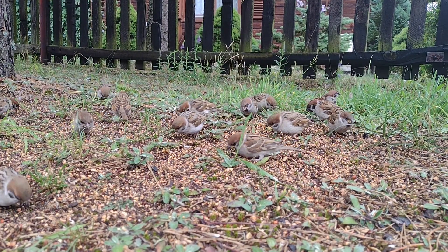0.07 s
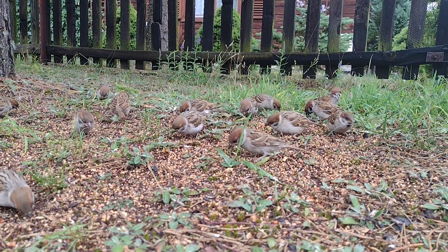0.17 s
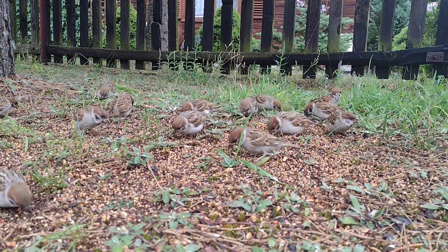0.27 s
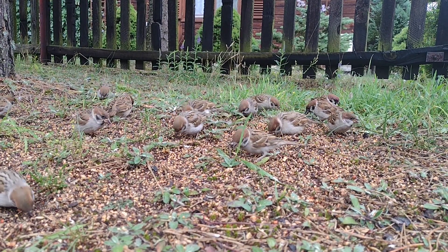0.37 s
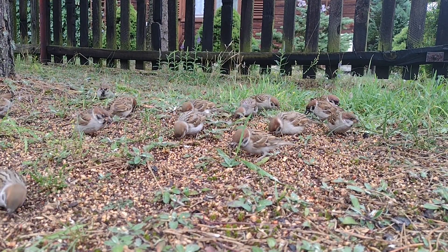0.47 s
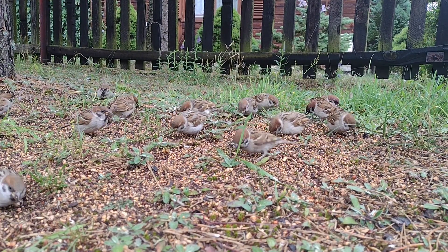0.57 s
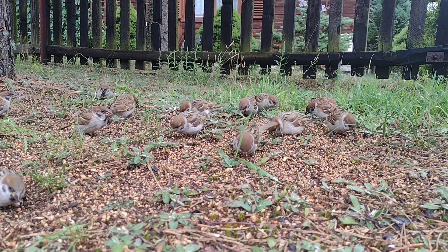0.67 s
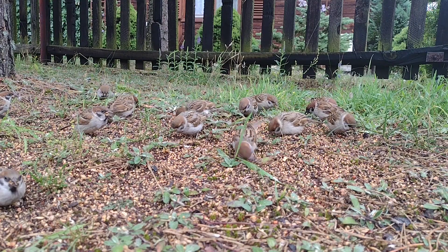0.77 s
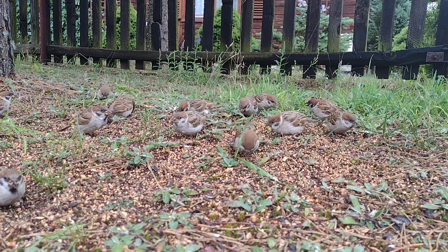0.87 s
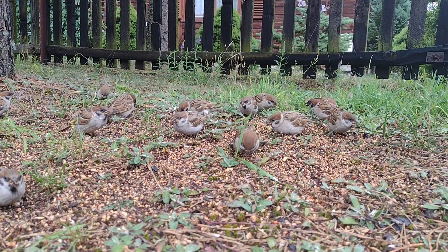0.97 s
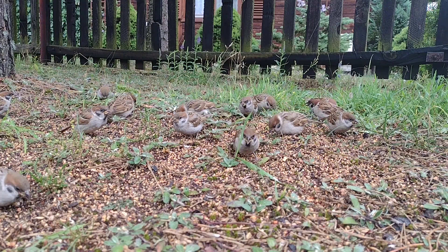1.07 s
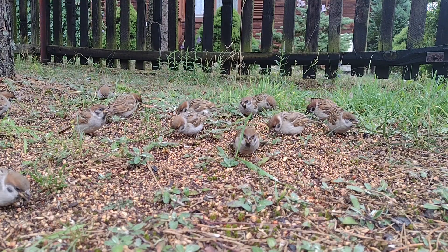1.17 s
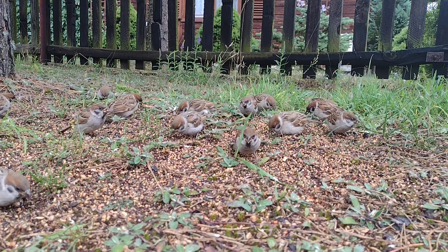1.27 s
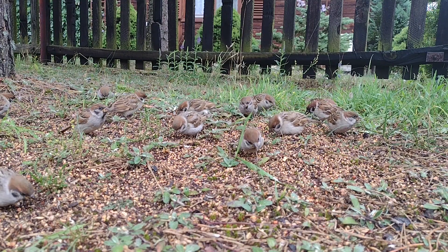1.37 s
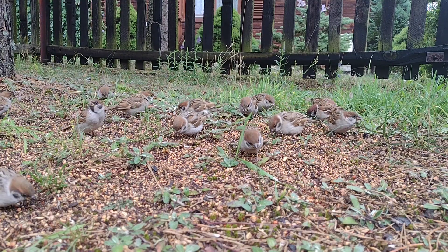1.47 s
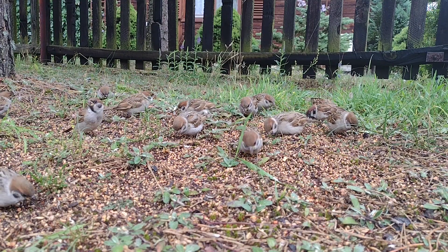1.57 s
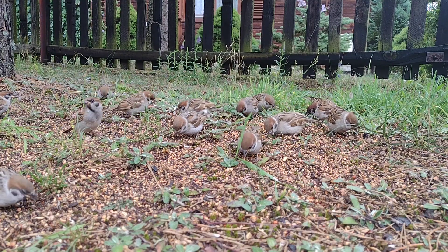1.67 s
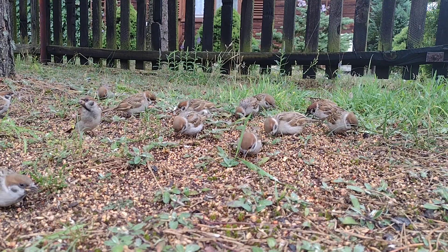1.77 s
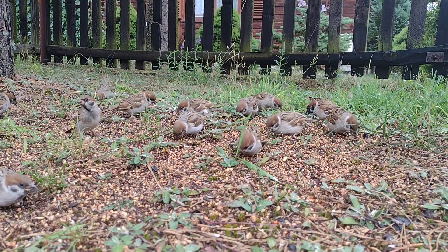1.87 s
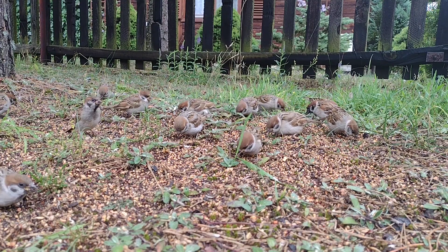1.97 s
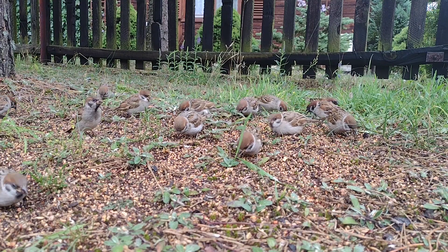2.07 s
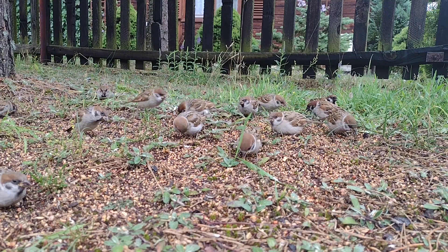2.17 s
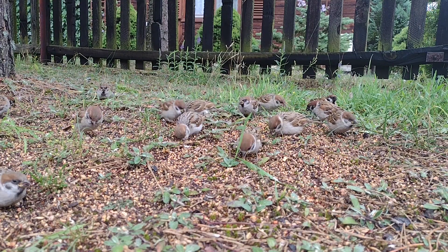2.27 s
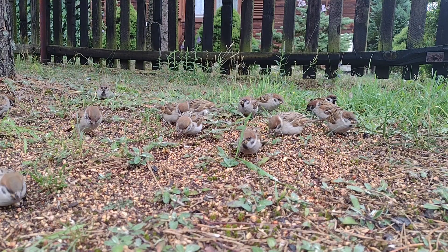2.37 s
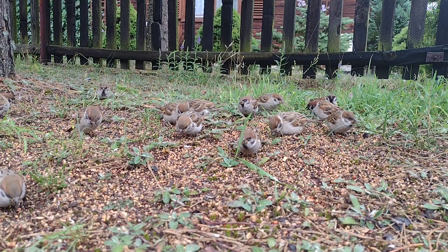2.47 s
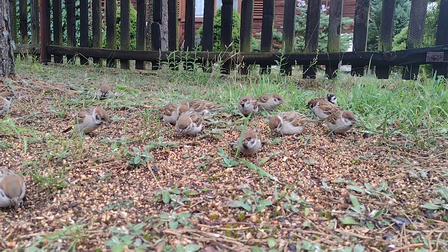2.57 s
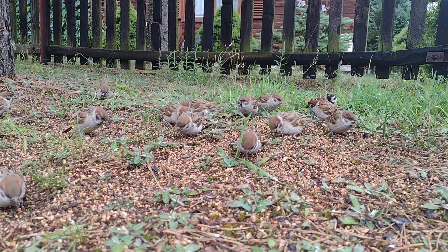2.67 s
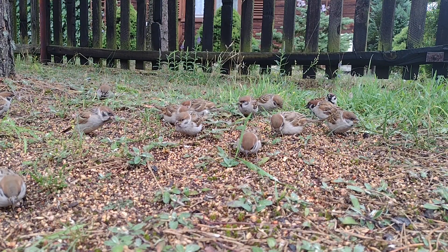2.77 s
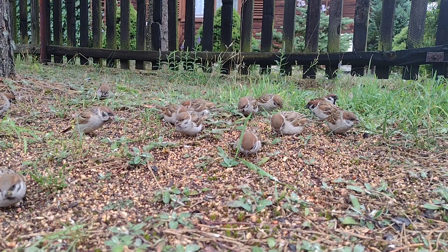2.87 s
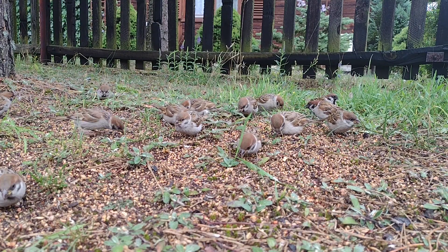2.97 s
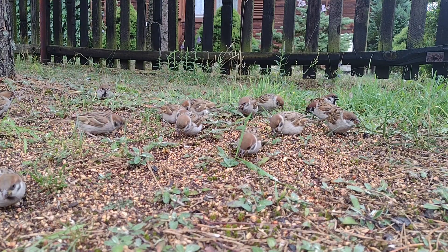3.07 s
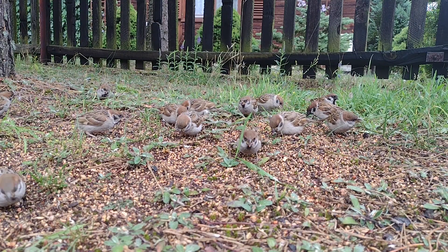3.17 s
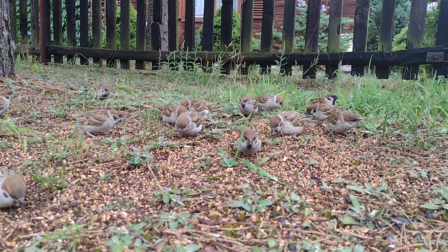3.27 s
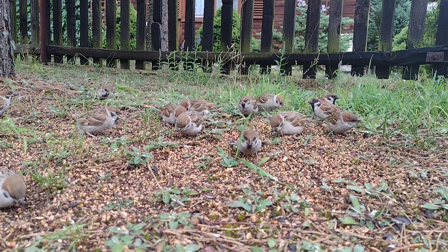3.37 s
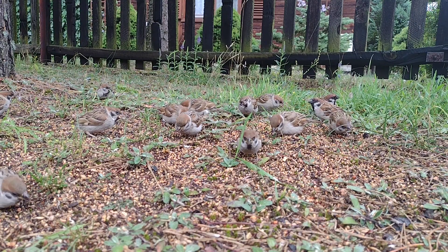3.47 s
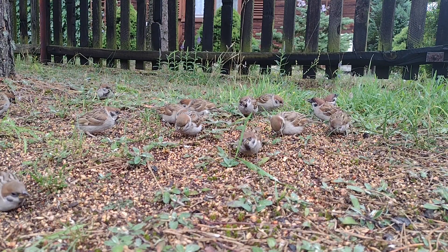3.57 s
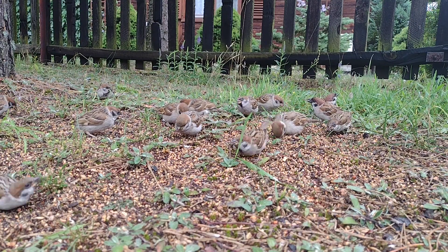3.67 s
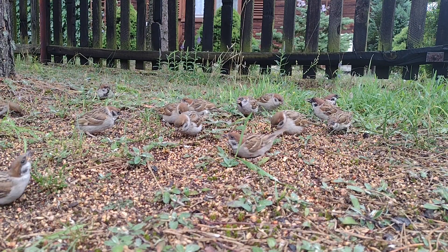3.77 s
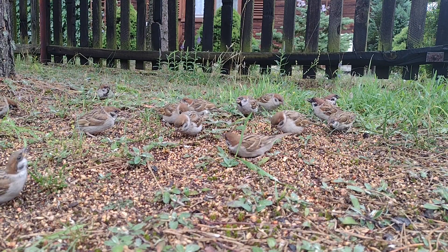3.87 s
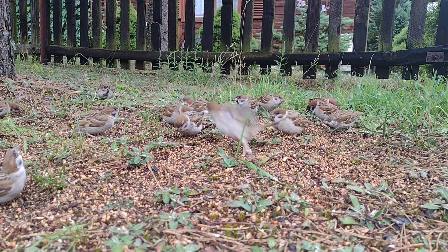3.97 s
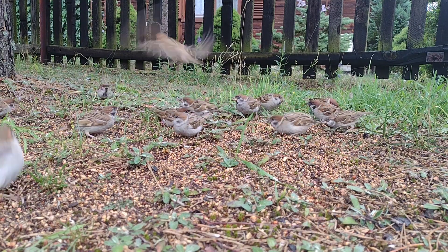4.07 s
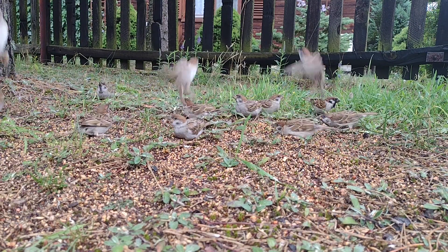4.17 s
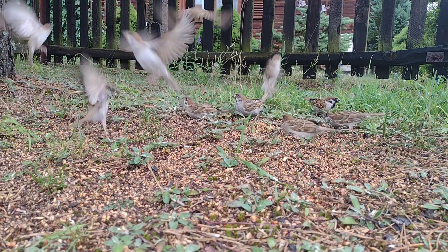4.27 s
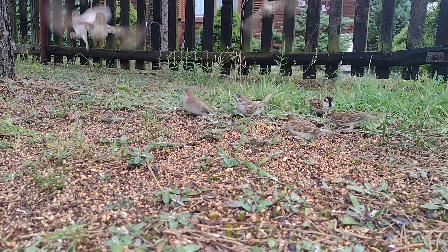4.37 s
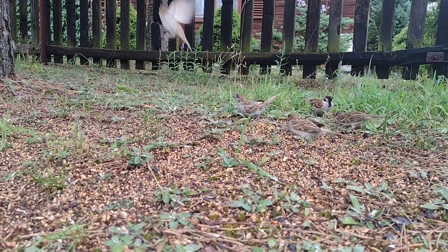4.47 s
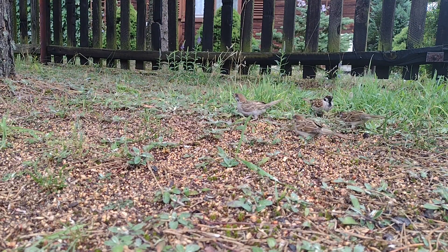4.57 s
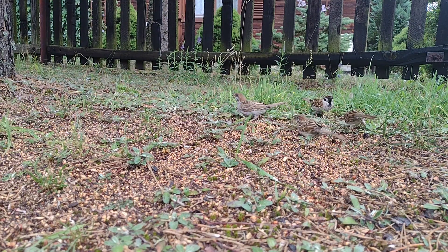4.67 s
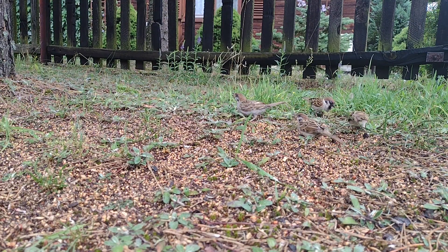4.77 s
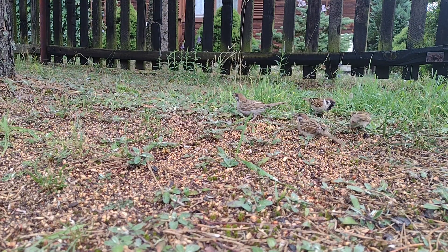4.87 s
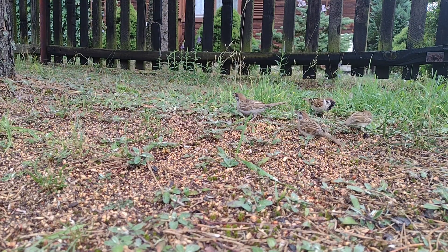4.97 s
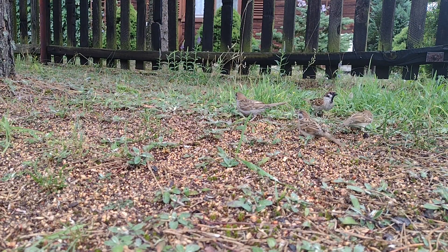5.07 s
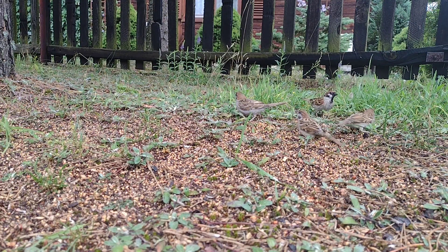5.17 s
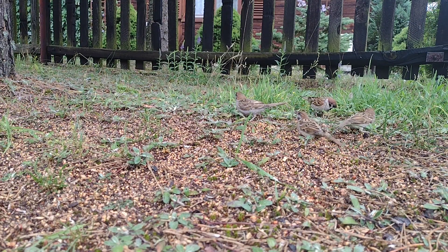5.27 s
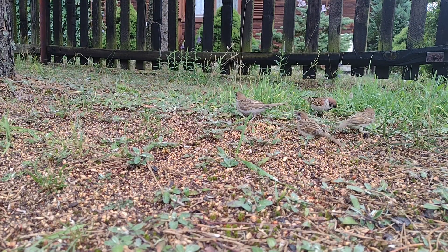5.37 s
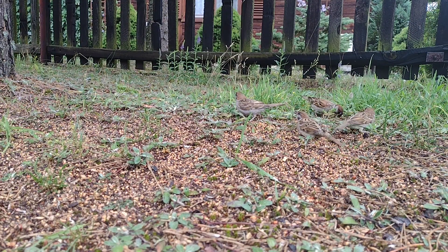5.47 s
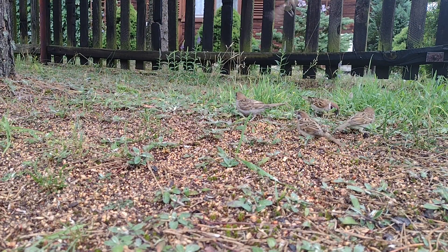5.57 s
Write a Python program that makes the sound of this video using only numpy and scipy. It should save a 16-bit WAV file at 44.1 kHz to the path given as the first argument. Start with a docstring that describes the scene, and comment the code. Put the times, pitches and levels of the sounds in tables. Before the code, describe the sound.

A low microphone sits close to sparrows feeding on seed outdoors. From 0 to 4 seconds it is quiet: soft hiss, a faint distant hum and light wind rumble that swells near 0.5 seconds, with low bumps towards the left. Tiny dry pecks and brittle husk cracks sprinkle across the stereo field, with brief foot scuffs in litter at the start, 0.55, 0.9, 1.4 and 3.1. Thin, near-pure, very high peeps fall slightly in pitch, about four or five a second; one lower, raspy-then-clear chirp leaps up at 0.4. At 4.1 the birds startle, and by 4.35 the flock is a loud fluttering whoosh and feathery swish, beating about 27 times a second. Close birds thump past around 4.3 and 4.5, with sharp seed ticks. Low air buffets hit the microphone at 4.8 to 5.1. Wings fade away, leaving peeps, pecks and scuffs near 5.4 until the end.

```python
"""Sparrows feed on seed on a lawn: beaks crack husks (snaps of noise with a brief ring), feet rake litter in grains.
Contact calls are near-sine tones that fall in pitch; lower chirps leap up from a raspy hook into a clear note.
Most of the flock then takes off: flapping gates noise into whoosh and swish, kicked seed ticks, close birds
pass with pressure pulses, and the draught buffets a low microphone.
Light wind rumbles as filtered noise under a distant outdoor hum and a soft hiss."""
import sys
import numpy as np
from scipy import signal
from scipy.fft import rfft, irfft, next_fast_len
from scipy.io import wavfile
from scipy.ndimage import uniform_filter1d

SR = 44100
rng = np.random.default_rng(int(sys.argv[2]) if len(sys.argv) > 2 else 0)


def unload_audio(sound):
    """Save the sound as a 16-bit wav file, at the path given as the first command line argument."""
    columns = np.transpose(np.atleast_2d(sound))
    # keep every value between -1 and 1, then stretch to whole-number steps
    steps = np.round(np.clip(columns, -1, 1) * 32767)
    wavfile.write(sys.argv[1], SR, steps.astype(np.int16))


N = 247842
TIME = np.arange(N) / SR

# thin falling calls: [t/s, fall in pitch f/Hz, level/dB, left minus right level/dB]
CONTACT_CALLS = [(.15, 600, -52.5, -7), (.37, 606, -52, 6), (.556, 970, -51, -9), (.764, 550, -51, 0),
                 (.982, 500, -46, 2), (1.13, 400, -50, 3), (1.365, 650, -52.5, 3), (1.53, 596, -55, -12),
                 (1.7, 550, -54, -4), (1.911, 700, -51, 1), (2.132, 300, -48, 4), (2.298, 1090, -48, 3),
                 (2.538, 1100, -46, 4), (2.815, 500, -45, -1), (2.865, 647, -47.5, 1),
                 (3.011, 420, -50.5, 4), (3.185, 500, -51.5, -3), (3.385, 650, -48, 8),
                 (3.605, 910, -45, -6), (3.975, 590, -48, -5), (4.637, 545, -44, -4),
                 (4.865, 300, -50.5, 6), (5.113, 353, -47, 7), (5.345, 680, -51, -10),
                 (5.555, 300, -52, -15)]
# lower chirps: [t/s of the upward hook, final pitch f/Hz, level/dB]
HOOKED_CHIRPS = [(0.368, 4076, -38.5), (1.995, 3280, -62)]
# cracking husks and kicked seed: [t/s, relative peak level/dB, ring f/Hz, left minus right level/dB]
HUSK_CRACKS = [(0.2872, -16.5, 10700, -0.5), (0.4134, -23.5, 8640, 2), (0.5715, -27, 9300, -0.5),
               (0.9028, -24, 10200, -2.5), (1.2974, -24, 11000, -4.5), (1.3107, -31, 10100, 3),
               (1.4144, -16, 11800, -4), (1.6282, -31, 11100, 0.5), (2.393, -25.5, 10200, 0.5),
               (2.6449, -22.5, 11900, -0.5), (2.752, -18, 8700, 11.5), (2.819, -27, 9250, -0.5),
               (2.8786, -24.5, 12900, 1.5), (3.032, -28.5, 8840, 8), (3.496, -21, 10500, -4),
               (4.0201, -20, 10200, -2.0), (4.1794, -16.5, 10900, -1), (4.2622, -7, 10000, 5),
               (4.3325, -3.5, 9600, 2.5), (4.432, -6, 10400, 7.5), (4.796, -15, 10400, 3.5),
               (4.9038, -19, 11800, -2.5), (5.4163, -15, 8990, 0.5)]
# spectrum of a husk's snap: [multiple of its ring frequency, level/dB]
SNAP_SPECTRUM = [(.05, -42), (.15, -28), (.4, -15.5), (.68, -14), (1, 2), (1.25, -8), (1.6, -18)]
# feet scratching and hopping in the litter; the 2 ms row is the lower part of a husk's crack:
# [t/s, length t/s, level/dB, centre f/Hz]
LITTER_SCUFFS = [(.003, .044, -43, 10000), (0.552, 0.079, -47, 10400), (0.894, 0.027, -41.5, 9900),
                 (1.296, 0.0024, -38, 4600), (1.391, 0.017, -40, 10800), (3.089, 0.025, -41.5, 10500),
                 (4.429, 0.0056, -28, 3460), (5.152, .02, -41.5, 1700), (5.378, .009, -39, 1610),
                 (5.379, 0.01, -33.5, 9800), (5.413, .02, -44, 1460)]
# birds that fly close past: [first stroke t/s, end t/s, stroke rate f/Hz, nearest t/s, level/dB]
CLOSE_PASSES = [(4.157, 4.355, 27.8, 4.3, -17.5), (4.399, 4.745, 24.6, 4.5, -16)]
# spectrum of a close stroke: [f/Hz, level/dB]
STROKE_SPECTRUM = [(120, 4.5), (300, -2), (600, -0.5), (900, -12), (1500, -28), (3500, -23.5)]
# spectra of the flock in flight: [f/Hz, level/dB per Hz]
DRAUGHT_SPECTRUM = [(20, 2.5), (42, 1), (62, 0.5), (80, 4.5), (104, -3), (135, -4), (220, -12), (330, -26)]
WHOOSH_SPECTRUM = [(100, 2.5), (230, 6), (340, 4), (480, 1.5), (660, -4.5), (1000, -13), (1400, -11.5),
                   (2000, -29)]
FEATHER_SPECTRUM = [(900, -3.5), (1900, -5), (3000, -6.5), (5200, -8), (7800, -4), (10000, 2.5),
                    (12500, -3.5), (15800, -10.5)]
# eddies that hit the microphone: [t/s, peak level/dB before panning, f/Hz]
MICROPHONE_EDDIES = [(.161, -27, 33.7), (0.571, -28.5, 58), (.73, -26.5, 29.6), (1.015, -30.5, 44.7),
                     (2.208, -31, 42.7), (2.378, -31, 29.3), (4.814, -17.5, 94), (4.912, -17.5, 40.8),
                     (5.051, -19, 45)]
# spectra of wind, hum and hiss: [f/Hz, level/dB per Hz]
RUMBLE_SPECTRUM = [(6, 6), (20, 8.5), (35, 2.5), (58, -6.5), (88, -4), (108, -15), (150, -26)]
HUM_SPECTRUM = [(60, 3.5), (130, -2), (240, -4.5), (330, -5.5), (450, -9.5), (620, -11), (1000, -20),
                (1500, -21), (3000, -23)]
HISS_SPECTRUM = [(700, 3), (1500, -3.5), (2800, -3), (4000, -0.5), (5200, -2.5), (7500, 1.5), (10000, 4),
                 (12500, -4.5), (15800, -7.5)]
# course of the hiss: [t/s, level/dB before HISS_OFFSET_DB]
HISS_COURSE = [(0.0, -51.5), (1.95, -55.5), (2.64, -54), (3.17, -49.5), (4.05, -47)]

HUM_DB, HISS_OFFSET_DB = -46.5, 3.5
BREEZE_DB, GUST_DB, GUST_S = -39, -29.5, 0.55  # steady wind, and one gust with its time
EDDY_PAN_DB = 16  # left minus right
PECK_HZ = 10550
CRACK_LAG_S = .0011  # a crack begins this long after its listed time
PEEP_HZ, PEEP_HZ_PER_DB, PEEP_USUAL_DB = 7313, 14, -50  # pitch in mid call; a louder call is a little higher
PEEP_S, PEEP_S_PER_HZ = .05, .000022  # a deeper fall takes longer
# pitch leaps from a share of itself, overshoots by a share and sags back
HOOK_S, HOOK_FROM, OVERSHOOT, SAG_S = 0.0026, .48, .25, .034
STARTLE_S, TAKEOFF_S = 4.1, 4.35  # the first birds start; the whole flock is in the air
WAKE_S = 4.785  # the stirred air reaches the microphone
RECEDE_DB_PER_S = 4  # the wings fade as the flock draws away
PASS_S = 0.078  # time in which a bird covers its nearest distance
TOP_HZ = 16000


def undb(db):
    """Amplitude ratio: twenty decibels are a factor of ten."""
    return 10 ** (np.asarray(db) / 20)


def unit(x):
    """Normalisation to a root-mean-square of 1."""
    return x / np.sqrt(np.mean(x ** 2) + 1e-18)


def pan(db):
    """Interaural level difference: left and right gains share it equally."""
    return undb(np.array([[db], [-db]]) / 2)


def add(out, s, x):
    """Superposition: a short sound is summed in at time s."""
    i = max(int(s * SR), 0)
    out[:, i:i + x.shape[-1]] += x[..., :max(N - i, 0)]


def curve(rows):
    """Linear interpolation in time of the table's second column."""
    t, value = np.transpose(rows)
    return np.interp(TIME, t, value)


def colour(x, points):
    """Spectral shaping by (f/Hz, level/dB) points with rolled-off ends, keeping the power of white noise."""
    hz, db = np.transpose(points)
    size = next_fast_len(x.shape[-1] + 512)
    freqs = np.fft.rfftfreq(size, 1 / SR)
    gain = undb(np.interp(np.log(freqs + 1), np.log(hz), db))
    low_end = freqs / (freqs + hz[0] / 2)
    high_end = 1 + (freqs / (2 * hz[-1])) ** 4
    response = unit(gain * low_end / high_end)
    return irfft(rfft(x, size) * response, size)[..., :x.shape[-1]]


def noise(likeness, size=N):
    """Partial correlation: two channels of white noise share a part of their power."""
    common, *own = rng.standard_normal((3, size))
    share = np.clip(likeness, 0, 1)
    return np.sqrt(share) * common + np.sqrt(1 - share) * np.array(own)


def diffuse(likeness, null_hz=1350):
    """Diffuse field at two spaced ports: coherence is highest in the bass and follows a sinc in frequency."""
    size = next_fast_len(N)
    alike = np.clip(likeness, 0, .99) * np.sinc(np.fft.rfftfreq(size, 1 / SR) / null_hz)
    weights = np.sqrt(np.array([1 + alike, 1 - alike]) / 2)
    spectra = rfft(rng.standard_normal((2, size))) * weights
    mid, side = irfft(spectra, size)[:, :N]
    return np.array([mid + side, mid - side])


def walk(rate):
    """Random modulation: held random steps, twice averaged into a smooth wander with spread near 1."""
    k = max(int(SR / rate), 1)
    steps = np.repeat(rng.standard_normal(N // k + 1), k)
    return 1.3 * uniform_filter1d(uniform_filter1d(steps, k), k)[:N]


def envelope(at, attack_s, hold_s, release_s):
    """Exponential growth to 1 at a given time, a hold, then exponential decay."""
    growth = np.minimum(TIME - at, 0) / attack_s
    decay = np.maximum(TIME - at - hold_s, 0) / release_s
    return np.exp(growth - decay)


def air_push(t, hz):
    """Pressure of a passing parcel of air: it rises, swings under and recovers; peak 1."""
    u = 2 * np.pi * hz * t
    return -u * np.exp((1 - u ** 2) / 2)


def wind(gust_db=2.5):
    """Turbulence at the microphone ports, stronger on the left: a breeze, one gust and single eddies."""
    gust = undb(GUST_DB) * envelope(GUST_S, attack_s=0.97, hold_s=0.046, release_s=0.5)
    strength = np.hypot(undb(BREEZE_DB), gust) * undb(gust_db * walk(20))
    out = unit(colour(noise(0.11), RUMBLE_SPECTRUM)) * pan(4.6) * strength
    t = np.arange(-2048, 2048) / SR
    for s, db, hz in MICROPHONE_EDDIES:
        add(out, s + t[0], undb(db) * pan(EDDY_PAN_DB) * air_push(t, hz))
    return out


def outdoors():
    """Diffuse background: a distant hum that gently swells, and a soft hiss that dips and then rises."""
    swell, flicker = .5 * walk(6), .5 * walk(14)  # dB
    hum = unit(colour(diffuse(0.61), HUM_SPECTRUM)) * undb(HUM_DB + swell)
    hiss = unit(colour(diffuse(0.063), HISS_SPECTRUM)) * pan(1.0)
    hiss *= undb(curve(HISS_COURSE) + HISS_OFFSET_DB + flicker)
    return hum + hiss


def garden(x, t60, wet_db):
    """Scattering by grass, fence and trees: a faint decaying tail, different on each side."""
    t = np.arange(SR // 2) / SR
    tail = rng.standard_normal((2, len(t))) * undb(-60 * t / t60) * (t > .002)
    tail /= np.sqrt(np.sum(tail ** 2, axis=1, keepdims=True))
    return x + undb(wet_db) * signal.fftconvolve(x, tail, axes=1)[:, :N]


def scuffs(skirt_db=-18):
    """Granular friction: grains of band-shaped noise of random strength, for raking feet and one crack's low part."""
    out, t = np.zeros((2, N)), np.arange(SR // 10) / SR
    for s, length, db, hz in LITTER_SCUFFS:
        grains = noise(0.18, size=len(t)) * undb(2.6 * rng.exponential(size=len(t)))
        band = [(hz / 4, 2 * skirt_db), (hz / 2, skirt_db / 2), (hz, 0), (2 * hz, skirt_db)]
        rake = unit(colour(grains, band))
        add(out, s, undb(db) * rake * np.sin(np.pi * np.minimum(t / length, 1)))
    return out


def tick(hz, pan_db, ring=0.85, lag_s=0.00028):
    """Brittle fracture: a husk snaps and rings briefly, the nearer port hearing it first; peak near 1."""
    t, snap_s, ring_s = np.arange(-128, 384) / SR, .00024, .00016
    lead = lag_s * np.tanh(pan_db / 6) * np.array([[.5], [-.5]])
    age = np.maximum(t + lead, 0)
    burst = noise(0.62, size=len(t)) * np.exp(-age / snap_s) * (age > 0)
    snap = colour(burst, [(k * hz, db) for k, db in SNAP_SPECTRUM])
    crack = snap + ring * np.exp(-age / ring_s) * np.sin(2 * np.pi * hz * age)
    return pan(pan_db) * crack / np.sqrt(np.sum(crack ** 2, axis=1, keepdims=True) / 5)


def pecks(level_db=-38, spread_db=4.0, count=110):
    """Random superposition: many tiny pecks of the flock, few of them loud."""
    out = np.zeros((2, N))
    for when, weakness, size, side in rng.random((count, 4)):
        db = level_db - spread_db * np.log(weakness + .05)
        add(out, when * N / SR, undb(db) * tick(PECK_HZ * (0.85 + 0.36 * size), 12 * (side - .45)))
    return out


def peeps(quaver=0.0071, flutter_db=3):
    """Frequency modulation: near-sine contact calls swell, quaver and fall through nearly the same pitch."""
    out = np.zeros((2, N))
    wobble, flutter = 1 + quaver * walk(350), undb(flutter_db * walk(170))
    for s, fall_hz, db, pan_db in CONTACT_CALLS:
        u = np.linspace(0, 1, int((PEEP_S + PEEP_S_PER_HZ * fall_hz) * SR))
        i = int(rng.random() * (N - SR))  # each call takes its own stretch of the wander
        stretch = slice(i, i + len(u))
        middle_hz = PEEP_HZ + PEEP_HZ_PER_DB * (db - PEEP_USUAL_DB)
        hz = (middle_hz + fall_hz * (.5 - u)) * wobble[stretch]
        swell = unit(np.sqrt(np.abs(np.sin(np.pi * u))) * flutter[stretch])
        add(out, s, undb(db) * pan(pan_db) * swell * np.sin(2 * np.pi * np.cumsum(hz) / SR))
    return out


def cracks(tick_db=2.3):
    """Impulsive fracture: the loud cracks of husks and ticks of kicked seed."""
    out, lead = np.zeros((2, N)), 128 / SR  # a tick's own time starts this far ahead
    for s, db, hz, pan_db in HUSK_CRACKS:
        add(out, s + CRACK_LAG_S - lead, undb(db + tick_db) * tick(hz, pan_db))
    return out


def chirps(rasp=.14, clear_rasp=.015, hook_db=-6, overtone_db=-18):
    """Noisy frequency modulation: a raspy upward hook settles into a louder, clear, sagging note."""
    out = np.zeros(N)
    for s, hz, db in HOOKED_CHIRPS:
        age = TIME - s
        leap = HOOK_FROM + (1 - HOOK_FROM) * (1 + np.tanh(age / HOOK_S)) / 2
        pitch = hz * leap * (1 + OVERSHOOT * np.exp(-np.maximum(age, 0) / SAG_S))
        hook = envelope(s, attack_s=0.01, hold_s=.006, release_s=.012)
        note = envelope(s + 0.033, attack_s=.011, hold_s=0.013, release_s=0.013)
        rough_pitch = pitch * (1 + (clear_rasp + rasp * hook) * walk(1500))
        phase = 2 * np.pi * np.cumsum(rough_pitch) / SR
        loud = undb(db) * np.hypot(undb(hook_db) * hook, note)
        out += loud * (np.sin(phase) + undb(overtone_db) * np.sin(2 * phase))
    return pan(3.9) * out


def flight(burst_db, far_db, attack_s, hold_s, release_s):
    """Power sum of the burst as the birds lift off and the softer sound of wings drawing away."""
    far = envelope(TAKEOFF_S, attack_s=0.34, hold_s=0, release_s=np.inf)
    far *= undb(far_db - RECEDE_DB_PER_S * (TIME - TAKEOFF_S))
    burst = undb(burst_db) * envelope(TAKEOFF_S, attack_s, hold_s, release_s)
    return np.hypot(burst, far)


def wingbeats(beat_hz=26.68, sharp=2.0, count=5):
    """Amplitude modulation: birds flap at their own wandering rates and their powers add."""
    power = np.zeros((2, N))
    for side in np.linspace(-1, 1, count):
        hz = beat_hz * (1 + .08 * rng.standard_normal() + 0.061 * walk(9))
        phase = 2 * np.pi * (np.cumsum(hz) / SR + rng.random())
        downstroke = np.exp(sharp * np.cos(phase) / 2) * undb(2 * walk(7.4))
        power += (pan(4 * side) * downstroke) ** 2
    return np.sqrt(power / uniform_filter1d(power.mean(axis=0), SR // 8))


def flock(feather_beat=0.27, wake_db=-26.5):
    """Aerodynamic noise: downstrokes gate the whoosh and, more softly, the swish of feathers, over a draught."""
    beats = wingbeats()
    wake = undb(wake_db) * envelope(WAKE_S, attack_s=0.17, hold_s=0.3, release_s=0.1)
    draught = unit(colour(noise(0.96), DRAUGHT_SPECTRUM)) * pan(1.5)
    draught *= np.hypot(flight(burst_db=-22, far_db=-35.5, attack_s=0.084, hold_s=.2, release_s=0.15), wake)
    whoosh = unit(colour(diffuse(0.95) * beats, WHOOSH_SPECTRUM)) * pan(1.2)
    whoosh *= flight(burst_db=-28, far_db=-41.5, attack_s=0.043, hold_s=0.16, release_s=0.18)
    barbs = undb(2.1 * walk(700))  # feathers rub in small catches
    rubbing = diffuse(0.3) * beats ** feather_beat * barbs
    swish = unit(colour(rubbing, FEATHER_SPECTRUM)) * pan(1.6)
    swish *= flight(burst_db=-26.0, far_db=-39.5, attack_s=.045, hold_s=0.064, release_s=0.24)
    return (draught + whoosh + swish) * np.clip((TIME - STARTLE_S) / 0.021, 0, 1)


def strokes(push_hz=75, whoosh_s=0.0038, lag_s=0.0038, whoosh_db=-9, scatter_db=1.5):
    """Near and far field: a close downstroke's push falls with distance squared, its whoosh with distance."""
    out, t = np.zeros((2, N)), np.arange(-2048, 2048) / SR
    swing = np.exp(-(t / whoosh_s) ** 2 / 2)
    swing_rms = np.sqrt(np.mean(swing ** 2))
    for first, end, rate, nearest, level_db in CLOSE_PASSES:
        for s in np.arange(first, end, 1 / rate):
            distance = np.hypot(1, (s - nearest) / PASS_S)  # in units of the nearest distance
            whoosh = unit(colour(noise(0.76, size=len(t)), STROKE_SPECTRUM) * swing) * swing_rms
            push = air_push(t - lag_s, push_hz)
            stroke = push / distance ** 2 + undb(whoosh_db) * whoosh / distance
            db = level_db + scatter_db * rng.standard_normal()
            add(out, s + t[0], undb(db) * stroke)
    return out


def scene():
    """Linear superposition of air, feeding, voices and wings."""
    background = wind() + outdoors()
    feeding = garden(scuffs() + pecks() + cracks(), t60=0.02, wet_db=-9)
    voices = garden(peeps(), t60=.45, wet_db=-5) + garden(chirps(), t60=.4, wet_db=-10)
    wings = flock() + strokes()
    return background + feeding + voices + wings


def record(dry):
    """Clipping at full scale, then an elliptic low-pass that cuts the top."""
    low_pass = signal.ellip(10, .2, 70, TOP_HZ, fs=SR, output="sos")
    return signal.sosfilt(low_pass, np.clip(dry, -1, 1))


dry = scene()
out = record(dry)
unload_audio(out)
```